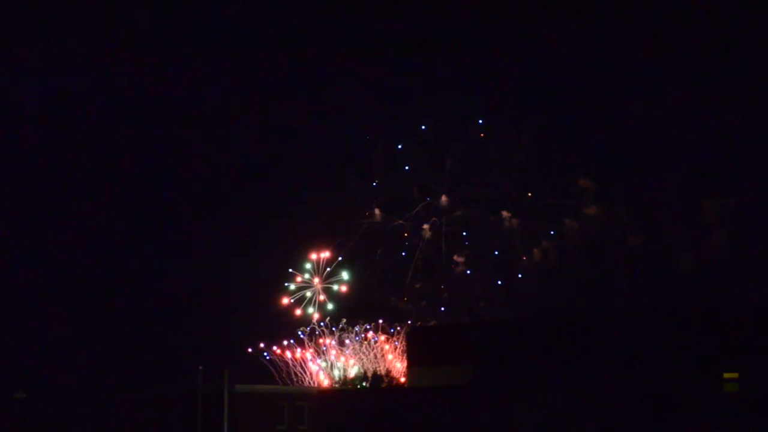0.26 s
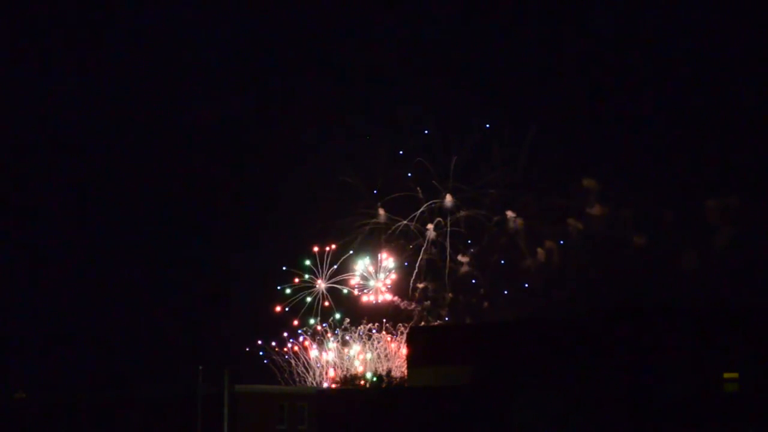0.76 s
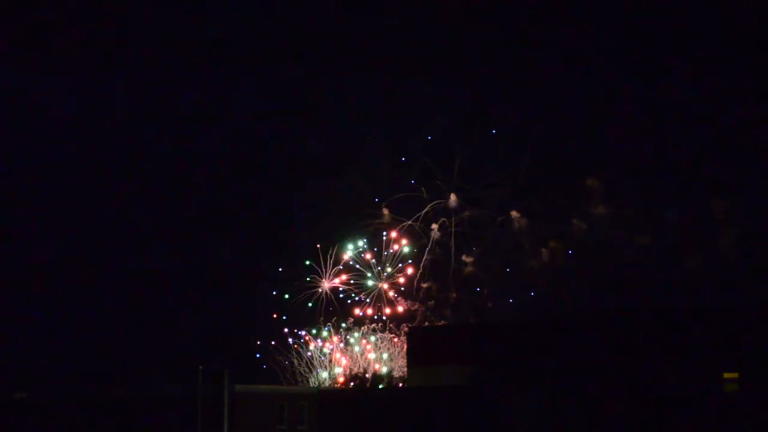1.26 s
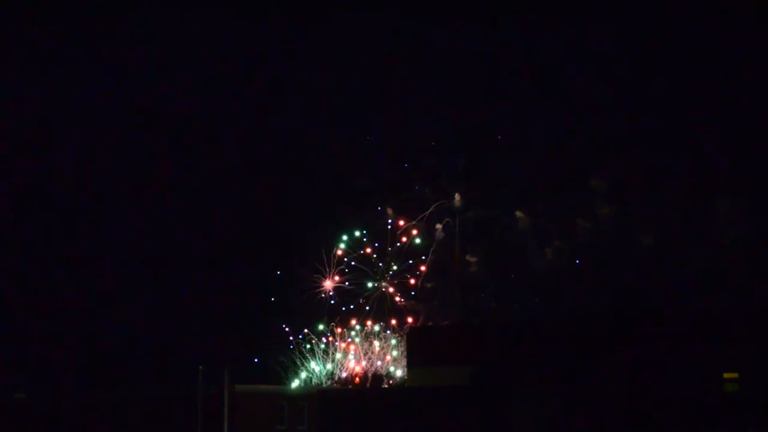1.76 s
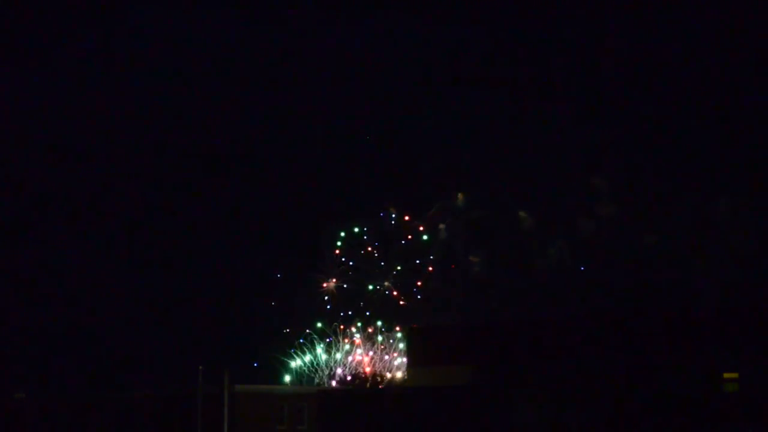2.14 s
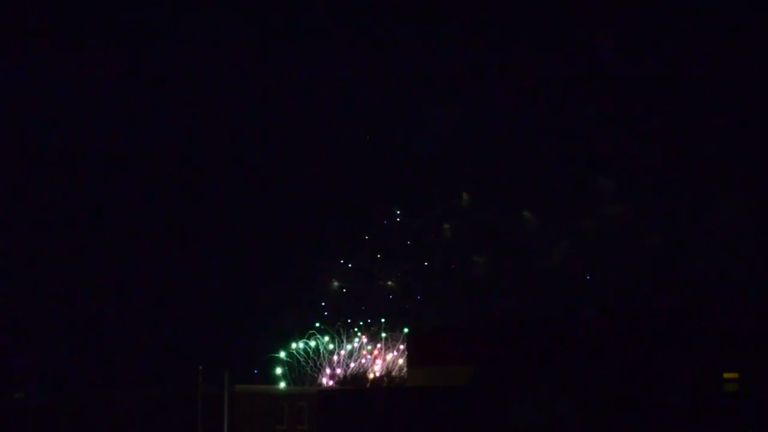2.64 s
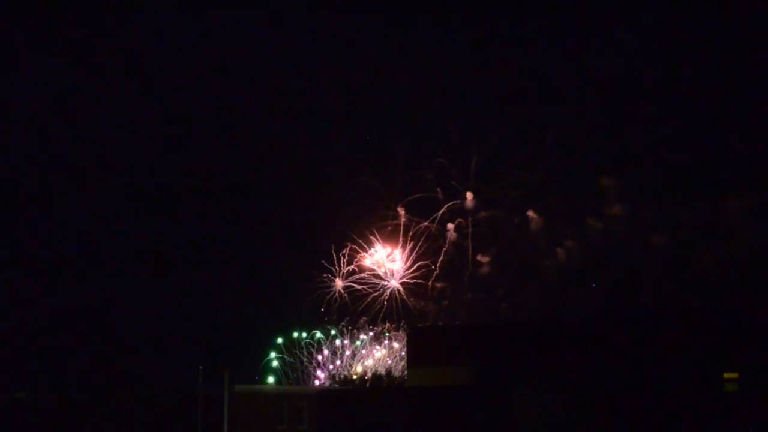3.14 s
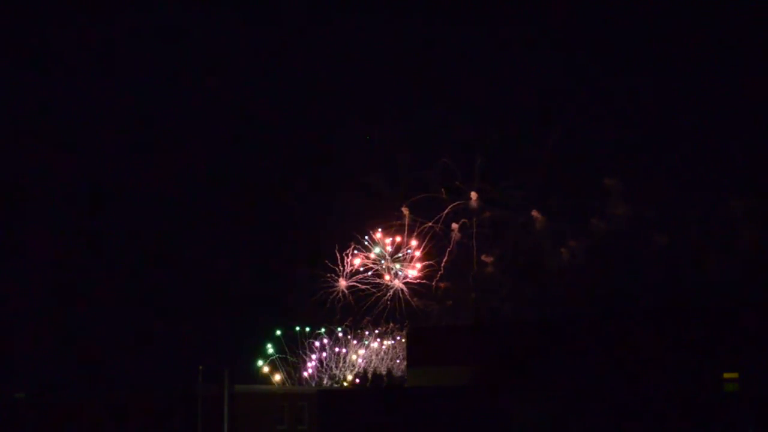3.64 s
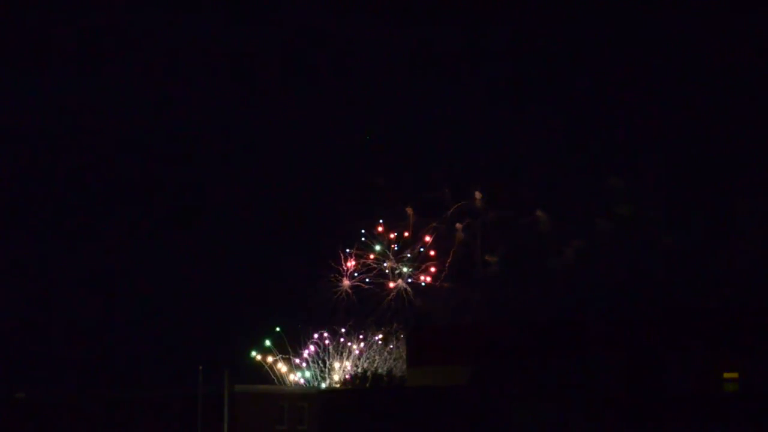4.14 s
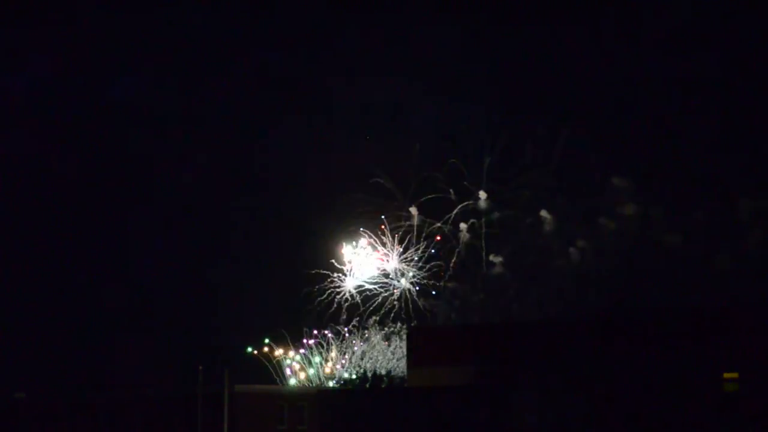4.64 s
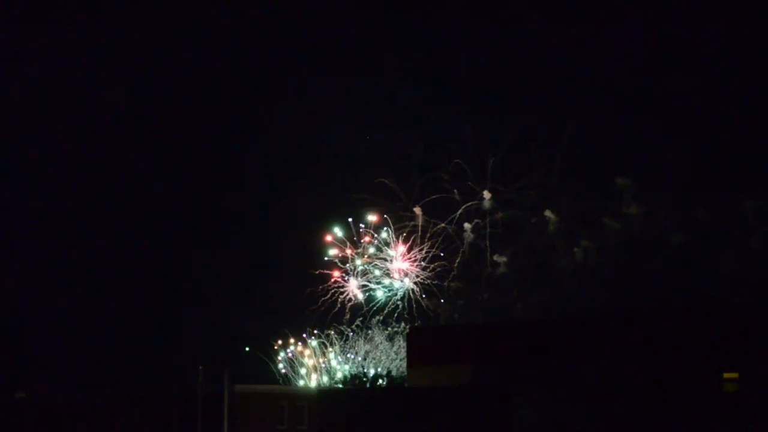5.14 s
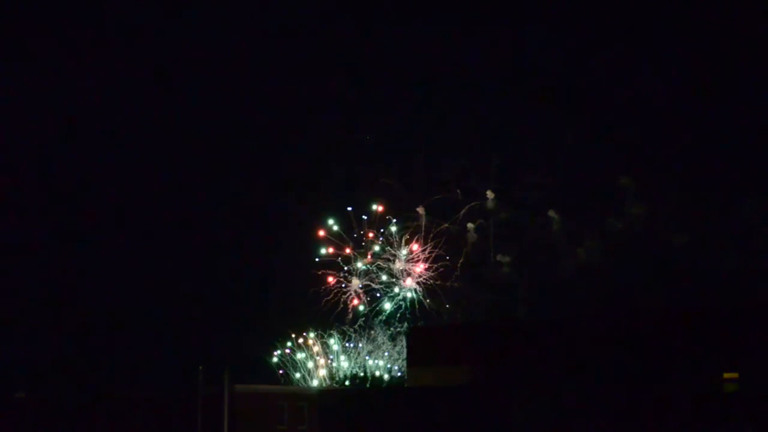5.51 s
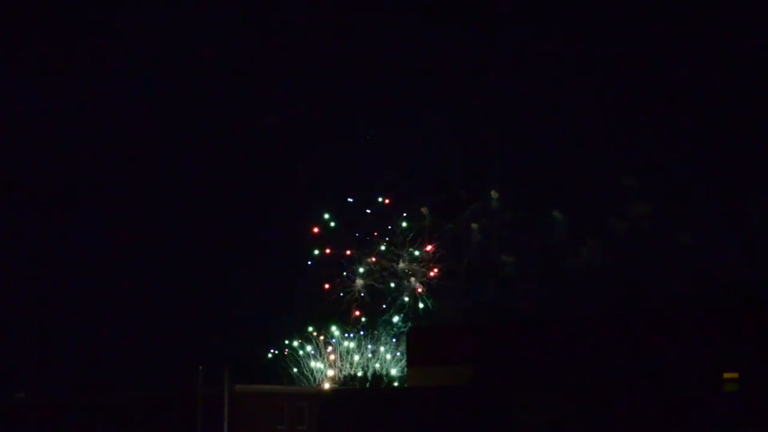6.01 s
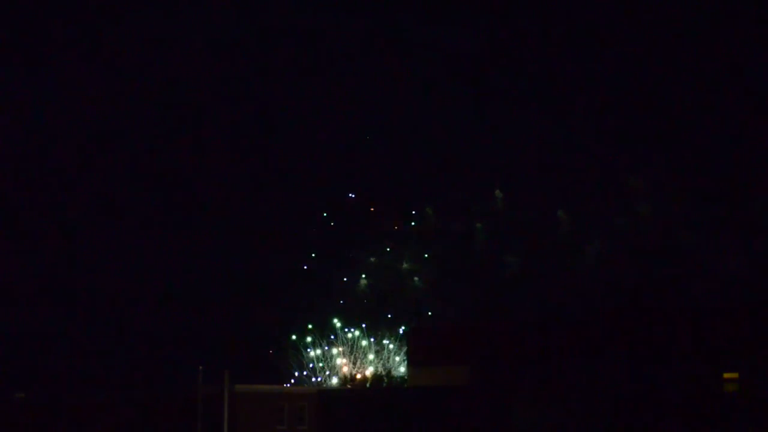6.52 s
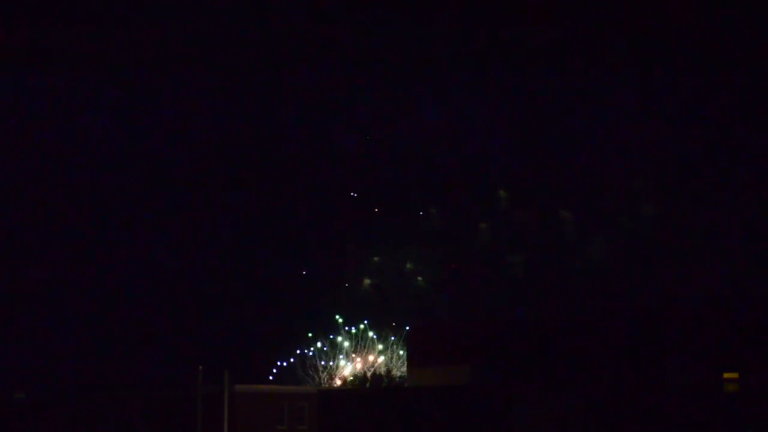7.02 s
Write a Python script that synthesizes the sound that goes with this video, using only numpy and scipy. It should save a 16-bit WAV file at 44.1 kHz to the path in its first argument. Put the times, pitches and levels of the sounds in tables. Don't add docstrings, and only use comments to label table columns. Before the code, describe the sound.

A night hillside at the edge of a town, heard through a small camera microphone. Low, uneven town rumble sits under the camera's own close, quiet noise: grainy gear whirr, soft motor hum, hiss and a barely audible, very high whistle that slowly swells and fades. At first the remains of an earlier firework burst roll away. At about 2.0 seconds a big shell goes off with a sharp, overloaded crack and deep thump, followed by a tumbling volley of echo slaps and low booms from walls and slopes. At about 3.7 seconds a second big bang, slightly less strong, renews the dense, clattering roll, which fades gradually through 5 and 6 seconds. At about 6.4 seconds a smaller, much weaker shell pops with a duller thud, and its short rumble and few echoes die away toward the end, leaving the whirr and hiss.

```python
import sys
import numpy as np
from scipy import signal
from scipy.fft import rfft, irfft, next_fast_len
from scipy.io import wavfile

SR = 44100
rng = np.random.default_rng(int(sys.argv[2]) if len(sys.argv) > 2 else 0)


def natural_amplitude(level_db):
    exponent = np.asarray(level_db, float) / 20
    return 10 ** exponent


def store_pcm(level_fs):
    pcm = np.round(np.clip(level_fs, -1, 1) * 32767).astype(np.int16)
    wavfile.write(sys.argv[1], SR, np.atleast_2d(pcm).T)


N = 320607
TIME = np.arange(N) / SR
SIZE = next_fast_len(N + SR)
FREQ = np.maximum(np.arange(SIZE // 2 + 1) * SR / SIZE, 1)

# t/s, front level/dB, front width/ms, ground echo level/dB, ground echo delay/ms
BLASTS = [
    (2.00354, -.9, .16, -6, .75),
    (3.71894, -3.9, .155, -11, .9),
    (6.4247, -19.5, .21, 3.5, .9),
]


def rms_one(x):
    return x / np.sqrt(np.mean(x ** 2) + 1e-20)


def shaped(x, response):
    return irfft(rfft(x, SIZE) * response, SIZE)[:N]


def coloured(points):
    hz, level_db = np.transpose(points)
    spectrum_db = np.interp(np.log(FREQ), np.log(hz), level_db, -90, -90)
    return rms_one(shaped(rng.standard_normal(N), natural_amplitude(spectrum_db)))


def drift(rate_hz):
    r = np.exp(-2 * np.pi * rate_hz / SR)
    wander = signal.lfilter([1], [1, -2 * r, r * r], rng.standard_normal(N + SR))
    return rms_one(wander[SR:])


def band(x, low_hz, high_hz):
    return signal.sosfilt(signal.butter(2, [low_hz, high_hz], "band", fs=SR, output="sos"), x)


def resonance(hz, width_hz):
    return 1j * FREQ * width_hz / (hz ** 2 - FREQ ** 2 + 1j * FREQ * width_hz)


def dying(age, t60):
    return (age > 0) * natural_amplitude(-60 * np.clip(age, 0, 9 * t60) / t60)


def through_air(x):
    return shaped(x, np.exp(-(FREQ / 2800) ** 2))


def whirr():
    # f/Hz, width/Hz, level/dB
    modes = [(1510, 66, -3), (2157, 206, 0), (2630, 51, -35), (2934, 258, -4), (3545, 44, -13.5),
             (3960, 131, 0.5), (4340, 49, -4), (4694, 290, -12), (5452, 198, -7), (6307, 166, -8),
             (6770, 120, -16), (7200, 410, -20.5), (7790, 230, -23.5), (9400, 100, -30.5),
             (2359, 37, -3), (3187, 21, -1.5), (6080, 59, -14.5), (1740, 140, -20.5)]
    # f/Hz, width/Hz
    notches = [(2450, 27), (2700, 60), (3330, 200), (5830, 220), (6900, 60), (7500, 200)]
    struck = rng.random(N) < 260 / SR
    strength_db = 2.0 * np.minimum(rng.exponential(1, N), 4)
    ticks = struck * natural_amplitude(strength_db) * rng.choice([-1, 1], N)
    friction = rng.standard_normal(N) * natural_amplitude(1.0 * drift(110))
    drive = rms_one(ticks) * 0.42 + friction
    casing = 0
    for k, (hz, width_hz, level_db) in enumerate(sorted(modes)):
        sign = (-1) ** k
        casing = casing + sign * natural_amplitude(level_db) * resonance(hz, 1.54 * width_hz) ** 2
    for hz, width_hz in notches:
        casing = casing * (1 - 1.3 * resonance(hz, width_hz))
    return natural_amplitude(-58.5) * rms_one(shaped(drive, casing))


def hum():
    return natural_amplitude(-68) * rms_one(shaped(rng.standard_normal(N), resonance(120.8, 6.4) ** 2))


def whistles():
    # f/Hz, level/dB
    tones = [(14971, -109), (15030, -109), (15741, -84), (15784, -103)]
    scan_hz, scan_db = 15741, -82.5
    beat_s, beat_low_s, beat_depth = 2.97, 0.08, 0.74
    swell = 1 - beat_depth * np.cos(2 * np.pi * (TIME - beat_low_s) / beat_s)
    out = natural_amplitude(scan_db) * swell * np.sin(2 * np.pi * scan_hz * TIME)
    for hz, level_db in tones:
        if abs(hz - scan_hz) > 20:
            out += natural_amplitude(level_db - 6) * np.sin(2 * np.pi * hz * TIME)
    return out


def hiss():
    # f/Hz, level/dB per Hz
    circuit = [(1500, -13), (4000, 11), (8000, -4), (11000, -9.5), (14000, -13), (15800, -13)]
    return natural_amplitude(-70.5) * coloured(circuit)


def town():
    # f/Hz, level/dB per Hz
    streets = [(13, -73), (22, -7.5), (91, -6.5), (102, -15.5), (114, -3.5), (210, -9), (396, -12),
               (478, -10.5), (720, -8), (1260, -12.5), (1460, -21), (1700, -31), (1900, -35), (2470, -33),
               (4180, -120)]
    return natural_amplitude(-58.5) * rms_one(coloured(streets) * natural_amplitude(0.76 * drift(10.0)))


def roll():
    # f/Hz, level/dB per Hz
    heavy_rumble = [(15, -44), (25, -5), (55, -2), (113, 5.5), (183, -8.5), (299, -2.5), (379, -25.5),
                    (500, -23), (650, -40), (1100, -120)]
    # f/Hz, level/dB per Hz
    light_rumble = [(15, -69.5), (25, -37), (64, -12), (145, -4.5), (183, -5.5), (251, -9), (307, -10.5),
                    (339, -13), (500, -10), (650, -33), (1100, -120)]
    # f/Hz, level/dB per Hz
    clatter_spectrum = [(210, -8), (350, -6.5), (388, -5.5), (960, 1.5), (1420, -4), (2170, -15.5),
                        (2660, -26), (2920, -34), (3200, -21), (4160, -79), (7040, -120)]
    # delay/s, level/dB
    terrain = [(.03, 0.5), (.2, -0.5), (.33, -5), (.41, -5.5), (.49, -6.5), (.64, -6), (.8, -8.5),
               (1.1, -13), (2.8, -24.5)]
    # t/s, rumble level/dB, rumble fade/(dB/s), clatter level/dB, clatter fade/(dB/s)
    rolls = [
        (-.28, -54, 4.5, -53.5, 3.5),
        (2.0035, -43.5, 4.5, -46, -1.64),
        (3.7189, -45, 0.5, -44.5, -1),
        (6.4247, -48.5, 7, -52, 2),
    ]
    onset_s = 0.024
    rumble_power, clatter_power = np.zeros(N), np.zeros(N)
    for s, rumble_db, rumble_fade, clatter_db, clatter_fade in rolls:
        age = TIME - s
        answer_db = np.interp(age, *np.transpose(terrain))
        onset = np.clip(age / onset_s, 0, 1) ** 4
        rumble_power += onset * natural_amplitude(answer_db + rumble_db - rumble_fade * age) ** 2
        clatter_power += onset * natural_amplitude(answer_db + clatter_db - clatter_fade * age) ** 2
    lumps = drift(25.0)
    low = np.where(TIME < BLASTS[-1][0], coloured(heavy_rumble), coloured(light_rumble))
    rumble = rms_one(low * natural_amplitude(0.88 * lumps))
    clatter = rms_one(coloured(clatter_spectrum) * natural_amplitude(1.56 * lumps + 0.76 * drift(70)))
    return np.sqrt(rumble_power) * rumble + np.sqrt(clatter_power) * clatter


def thuds():
    # t/s, peak level/dB, f/Hz
    faces = [(0.068, -43.5, 105), (2.099, -32, 110), (2.141, -28, 263), (2.162, -36, 121),
             (4.531, -43, 88.8), (2.274, -38.5, 130), (2.364, -32.5, 126), (2.461, -35.5, 105),
             (2.484, -36.5, 80), (2.54, -34.5, 111), (2.597, -37.5, 140), (2.619, -40, 120),
             (2.745, -36.5, 111), (3.311, -48, 83.4), (3.824, -35, 105), (3.857, -25.5, 200),
             (3.983, -36.5, 140), (4.086, -32, 106), (4.65, -46, 111), (4.184, -36, 111), (4.214, -40, 114),
             (4.323, -35, 110), (4.344, -38, 109), (4.465, -40.5, 257), (6.524, -37.5, 185),
             (6.565, -33, 201), (6.594, -38, 199), (6.645, -37.5, 170), (6.674, -42, 150),
             (6.791, -43.5, 127)]
    out, age = np.zeros(N), np.arange(SR // 5) / SR
    for s, peak_db, hz in faces:
        at = round((s + 0.00625) * SR)
        swell = np.clip(age * hz / 0.31, 0, 1)
        swing = dying(age, 7.0 / hz) * swell * np.sin(2 * np.pi * hz * age)
        out[at:at + len(age)] += natural_amplitude(peak_db + 3.5) * swing[:N - at]
    return out


def slaps():
    # t/s, peak level/dB, centre f/Hz, smear t60/s
    walls = [(0.194, -42.5, 900, 0.14), (1.066, -44, 721, 0.15), (2.151, -33.5, 1110, .05),
             (2.218, -35.5, 643, 0.053), (2.269, -39, 1130, .1), (2.324, -35, 696, 0.036),
             (2.372, -33, 1110, 0.064), (2.43, -39, 1180, 0.087), (2.478, -27.5, 970, 0.069),
             (2.576, -35.5, 1020, 0.18), (2.615, -38.5, 890, 0.12), (2.669, -40, 905, .05),
             (3.013, -41.5, 1250, 0.093), (3.843, -34, 1200, .05), (3.917, -35, 687, .095),
             (4.002, -29, 1360, 0.026), (4.039, -26, 670, 0.027), (4.096, -33, 1100, 0.046),
             (4.162, -30.5, 885, 0.049), (4.186, -31, 810, .075), (4.205, -27.5, 1240, 0.082),
             (4.33, -34.5, 1150, 0.16), (4.403, -35, 895, 0.076), (3.863, -25.5, 935, 0.04),
             (4.647, -40, 900, .09), (4.819, -42, 929, 0.18), (5.223, -41, 784, 0.13),
             (6.967, -43.5, 910, 0.12), (6.89, -35, 890, .09), (7.03, -44, 1000, .09)]
    sharp = 0.57
    out, age = np.zeros(N), np.arange(SR // 8) / SR
    for s, peak_db, hz, smear_t60 in walls:
        copy = dying(age, 0.007) * np.sin(2 * np.pi * hz * age)
        scatter = rms_one(band(rng.standard_normal(len(age)), hz * 0.75, hz * 1.48))
        scatter = scatter * dying(age, smear_t60) * np.clip(age / 0.0022, 0, 1)
        slap = natural_amplitude(peak_db) * (copy * 2.37 * sharp + scatter * (1 - sharp) * 1.25)
        at = round((s + 0.001586) * SR)
        out[at:at + len(age)] += slap[:N - at]
    return through_air(out)


def pressure_front(age, level_db, width_ms):
    side_ms = width_ms * np.where(age < 0, 1.3, 1)
    return -natural_amplitude(level_db) * np.exp(-0.5 * (age * 1e3 / side_ms) ** 2)


def blasts():
    # crack f/Hz, crack level/dB, crack t60/s, thump starting f/Hz, thump level/dB, thump t60/s
    ringing = [(1020, -4.5, .016, 128, -12.5, .075), (1050, -26, .03, 130, -11.5, .07),
               (980, -19.5, .025, 200, -14, .055)]
    # low f/Hz, high f/Hz, t60/s
    near_bands = [(57, 140, 0.27), (184, 654, 0.16), (520, 1120, 0.11), (1100, 1450, 0.049),
                  (2030, 2860, 0.034)]
    near_levels = [(-28.5, -21, -22, -24, -19.5), (-23.5, -22.5, -21, -19, -17.5),
                   (-43, -26.5, -27, -24, -29.5)]
    # f/Hz, width/Hz, level/dB
    body = [(291, 72, -1), (593, 61, 0), (1690, 870, 10), (2670, 1200, -22)]
    rattle = 3.5
    thump_end_hz, sag_s, thump_lag_s = 92, 0.0045, 0.00145
    fronts, blows, after = np.zeros(N), np.zeros(N), np.zeros(N)
    white = rng.standard_normal(N)
    near = [rms_one(band(white, low_hz, high_hz)) for low_hz, high_hz, _ in near_bands]
    for blast, rings, levels in zip(BLASTS, ringing, near_levels):
        s, front_db, width_ms, ground_db, ground_ms = blast
        crack_hz, crack_db, crack_t60, thump_hz, thump_db, thump_t60 = rings
        age = TIME - s
        pair = pressure_front(age, front_db, width_ms)
        pair += natural_amplitude(ground_db) * pressure_front(age - ground_ms / 1e3, front_db, width_ms)
        fronts += pair
        blows += natural_amplitude(rattle * front_db) * pair
        back = age - 0.15 / crack_hz
        after += natural_amplitude(crack_db) * dying(back, crack_t60) * np.sin(2 * np.pi * crack_hz * back)
        late = age - thump_lag_s
        sag = (thump_hz - thump_end_hz) * sag_s * (1 - np.exp(-np.abs(late) / sag_s))
        turns = thump_end_hz * late + sag
        after += natural_amplitude(thump_db) * dying(late, thump_t60) * np.sin(2 * np.pi * turns)
        rise = np.clip(age / 0.005, 0, 1)
        for noise, (_, _, t60), level_db in zip(near, near_bands, levels):
            after += natural_amplitude(level_db) * rise * dying(age, t60) * noise
    shaking = sum(natural_amplitude(level_db) * resonance(hz, width_hz) for hz, width_hz, level_db in body)
    return fronts + shaped(blows, shaking) + through_air(after)


def scene():
    camera = whirr() + hum() + whistles() + hiss()
    echoes = roll() + thuds() + slaps()
    return (camera + town() + echoes + blasts())[None]


def band_limit(x):
    return signal.sosfilt(signal.butter(12, 16510, fs=SR, output="sos"), x)


def record(dry):
    heard = signal.sosfilt(signal.butter(2, 52, "high", fs=SR, output="sos"), dry)
    return band_limit(np.clip(heard, -1, 1))


dry = scene()
out = record(dry)
store_pcm(out)
```